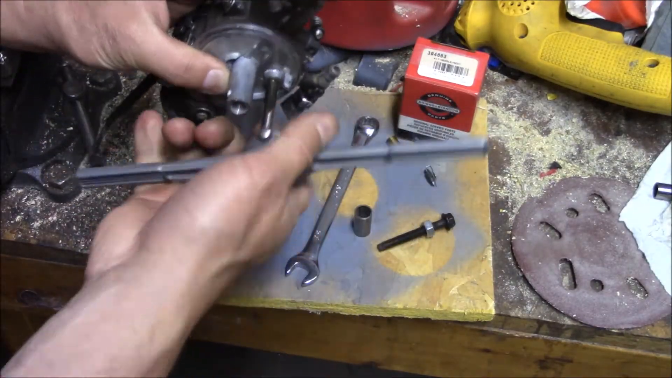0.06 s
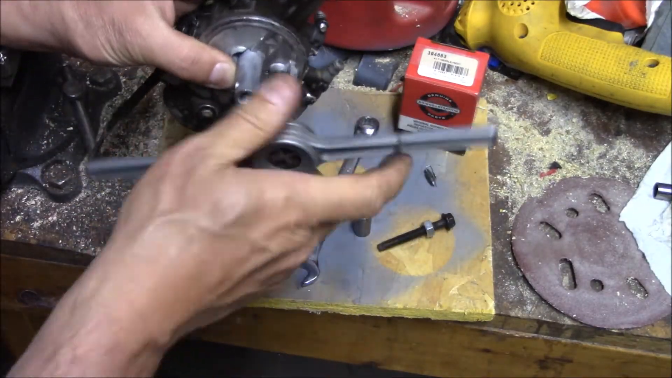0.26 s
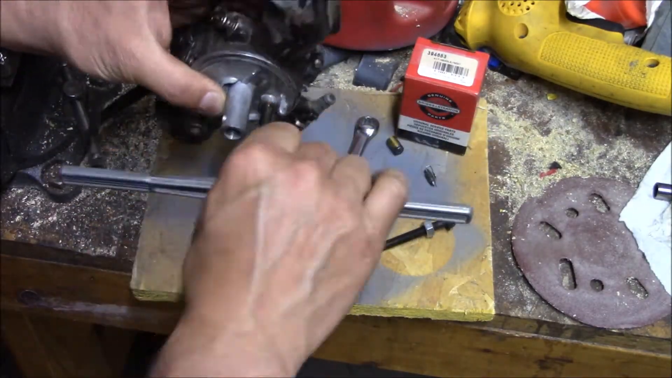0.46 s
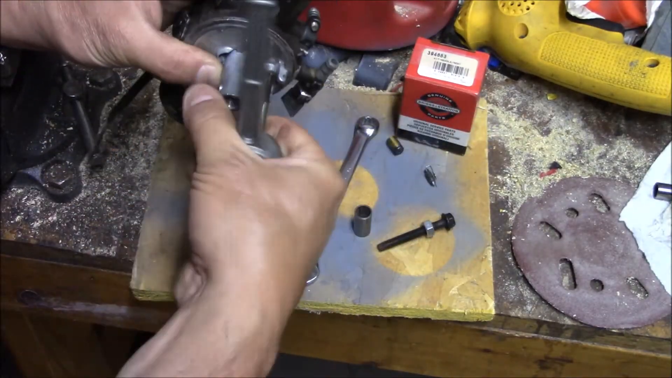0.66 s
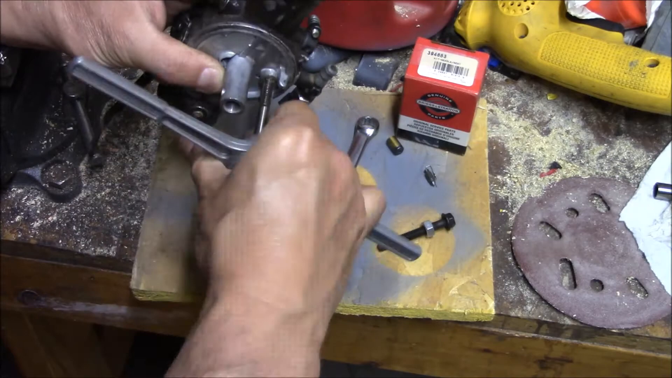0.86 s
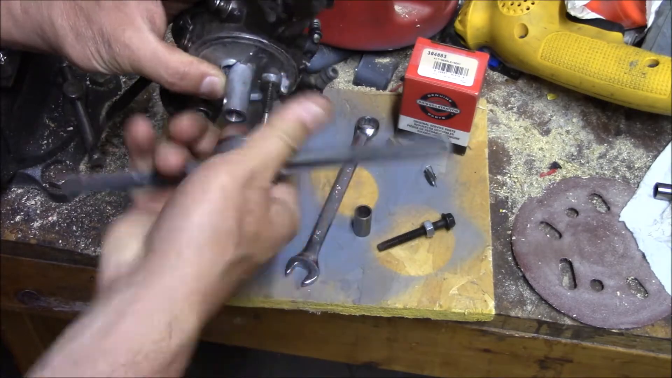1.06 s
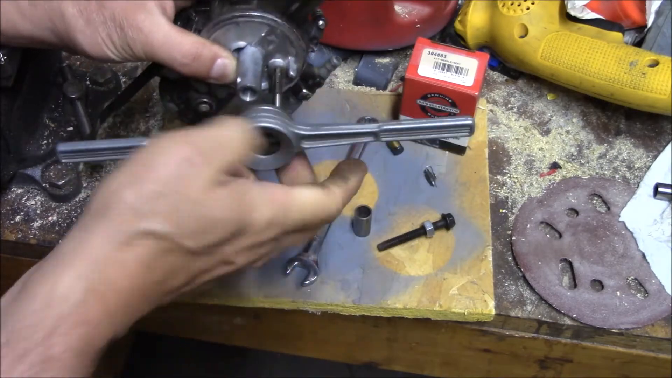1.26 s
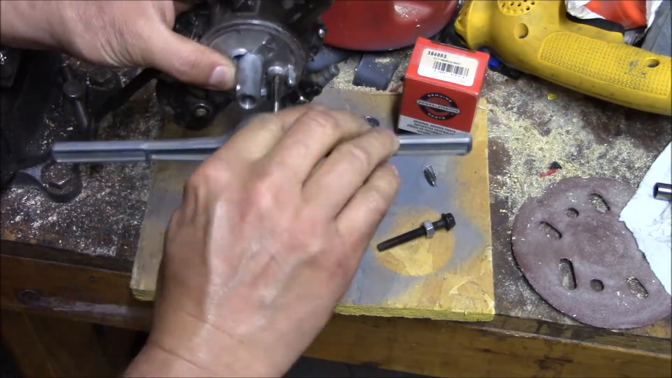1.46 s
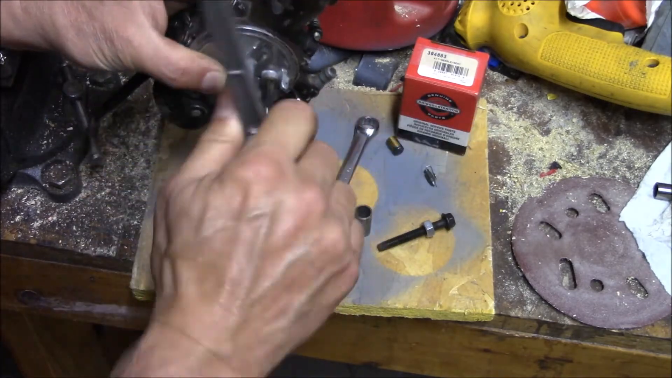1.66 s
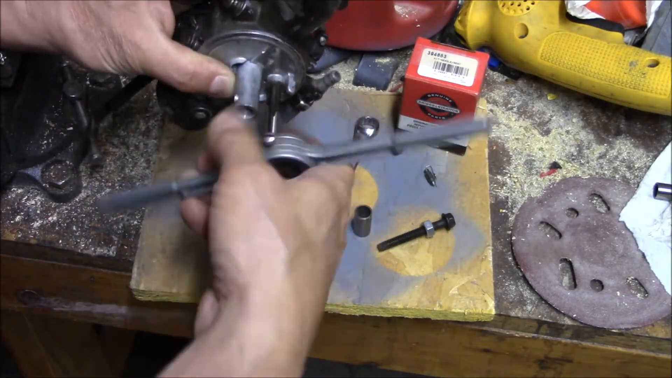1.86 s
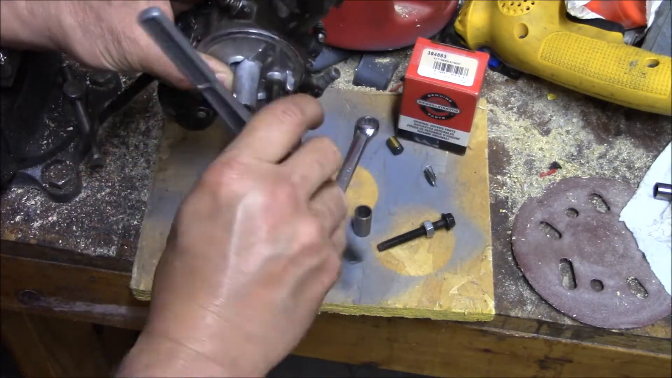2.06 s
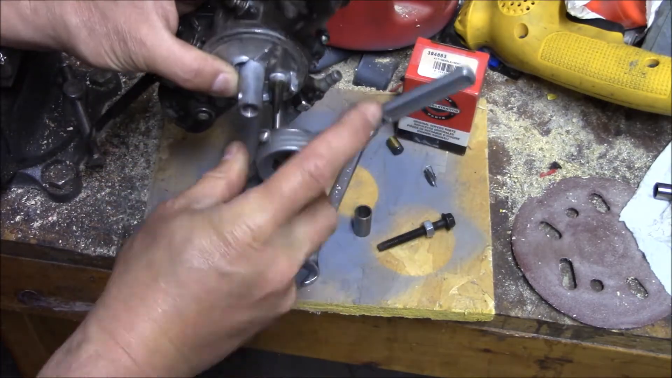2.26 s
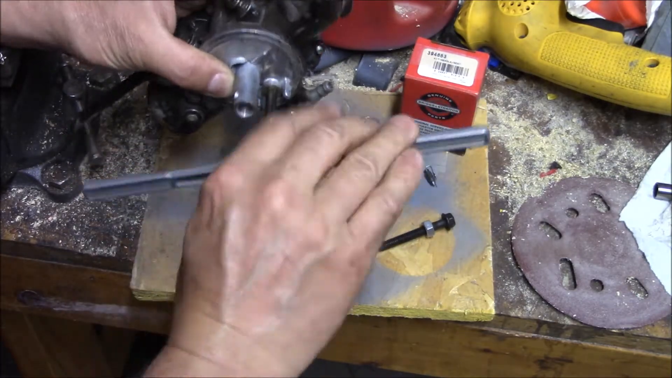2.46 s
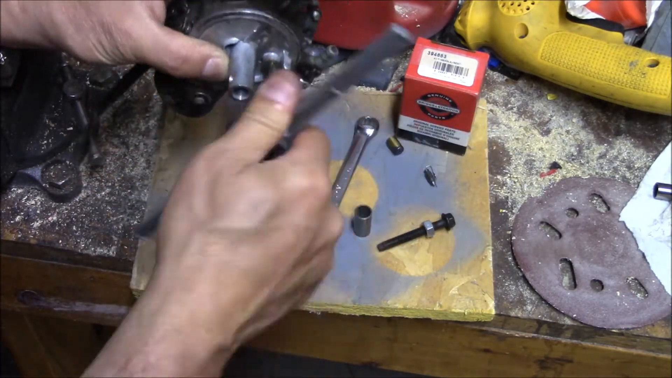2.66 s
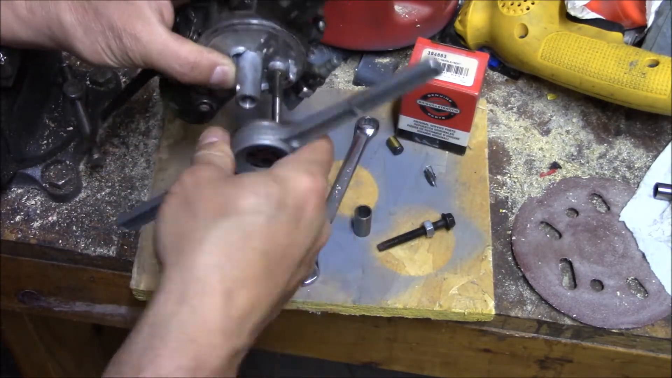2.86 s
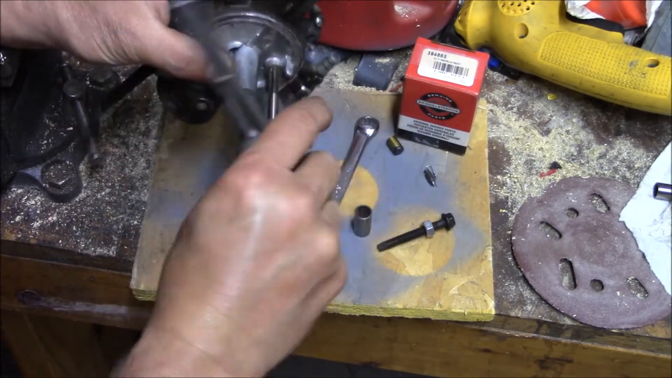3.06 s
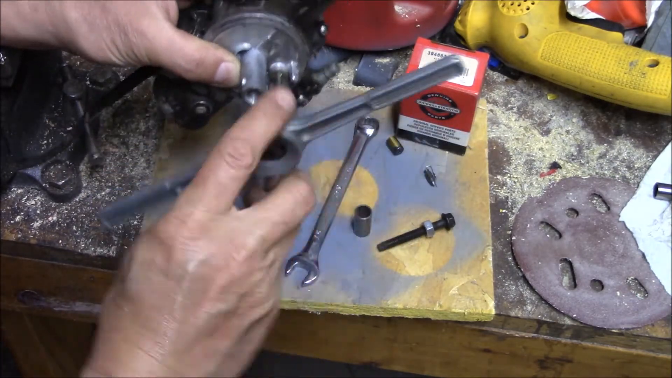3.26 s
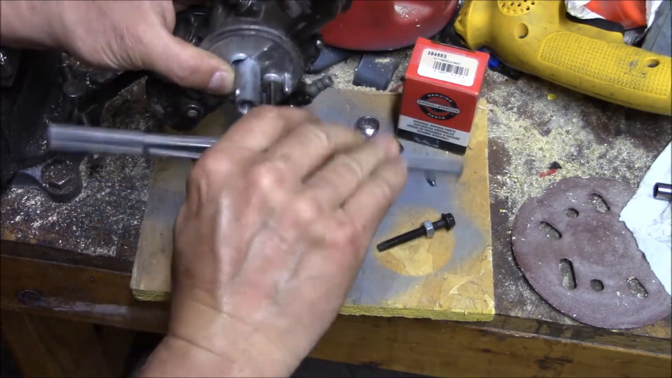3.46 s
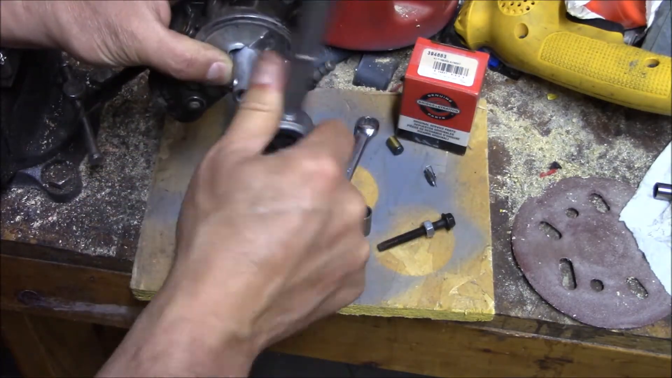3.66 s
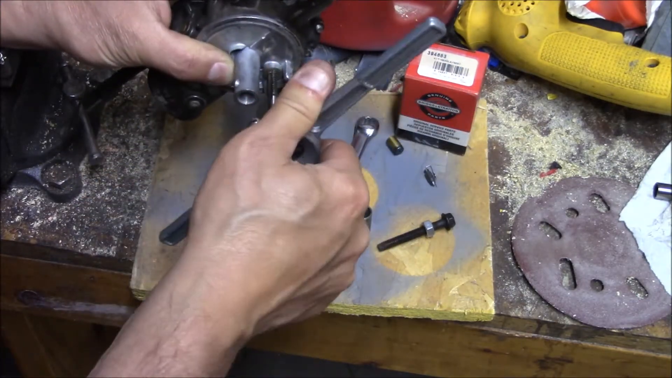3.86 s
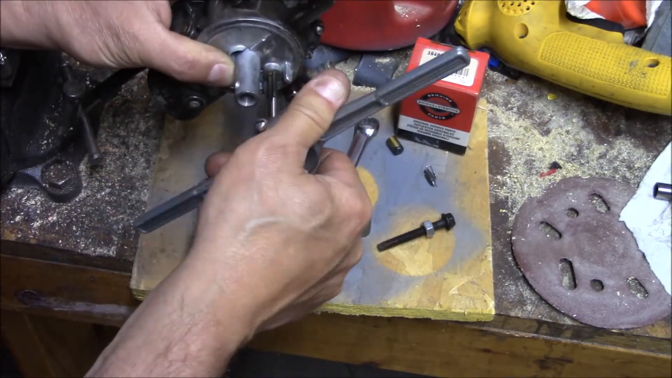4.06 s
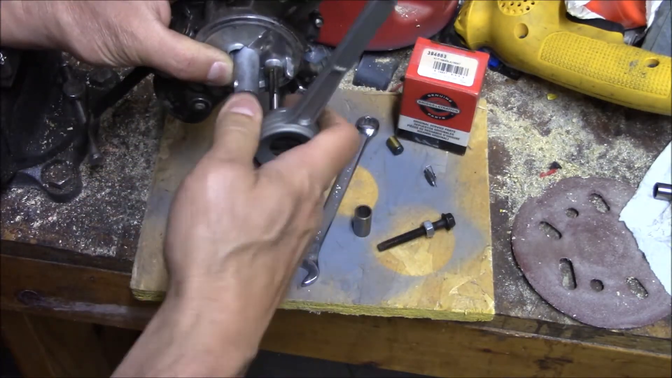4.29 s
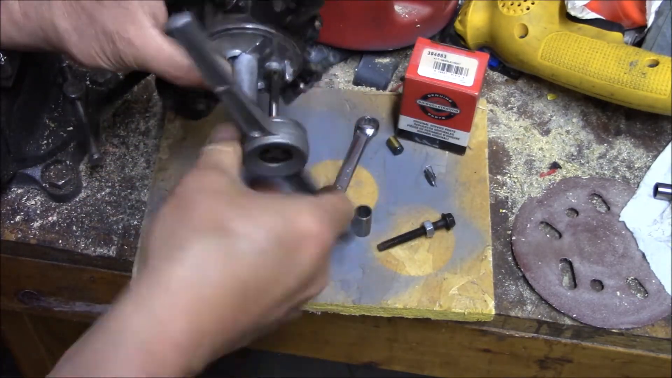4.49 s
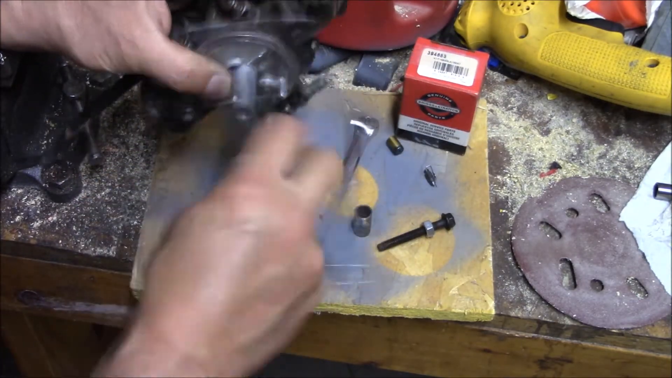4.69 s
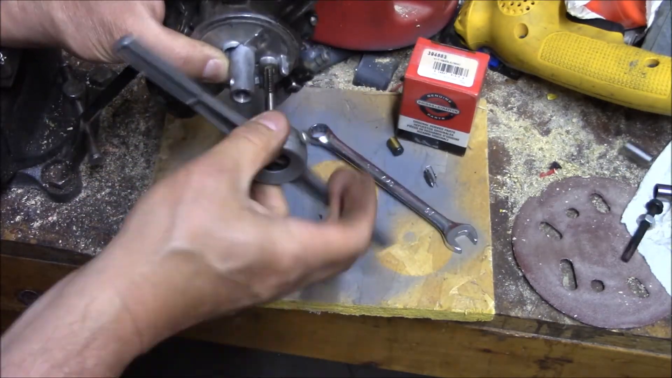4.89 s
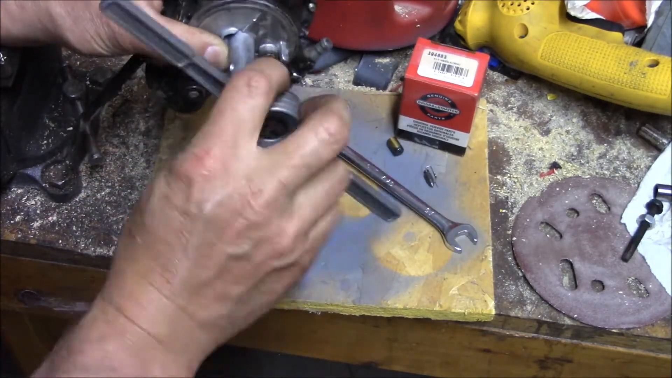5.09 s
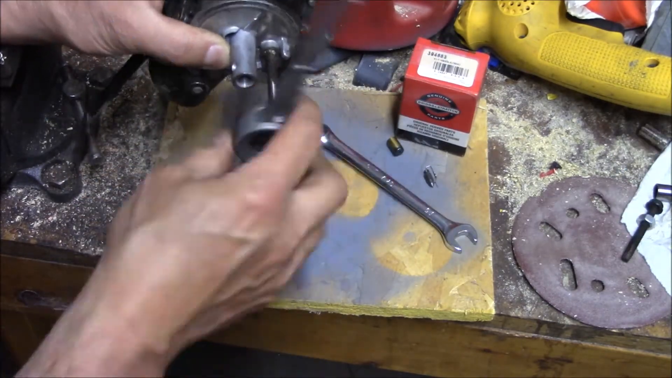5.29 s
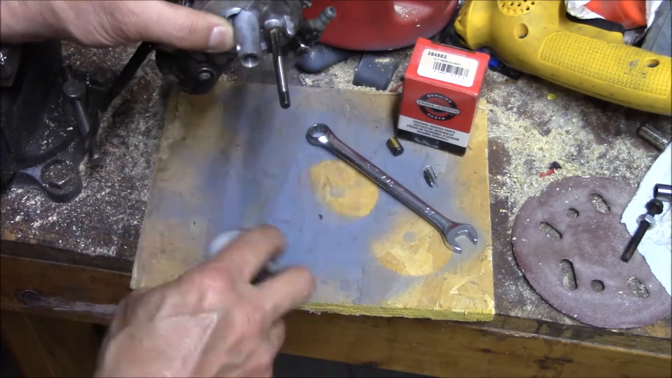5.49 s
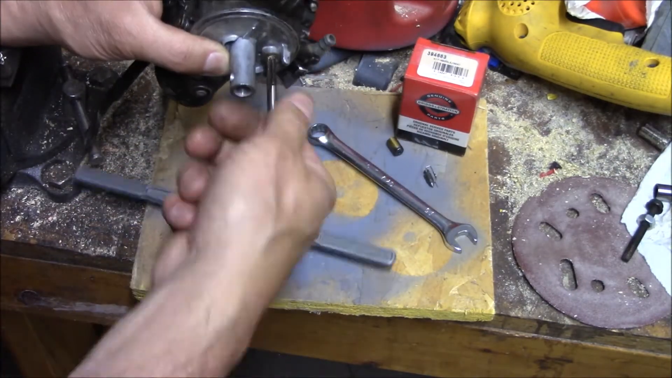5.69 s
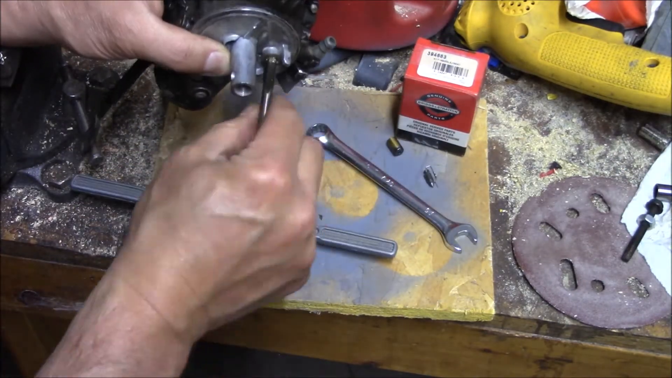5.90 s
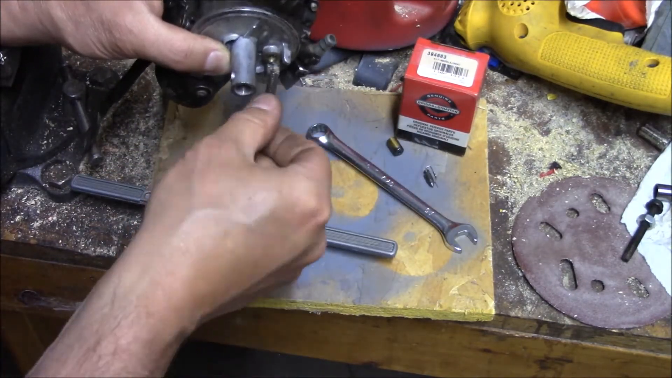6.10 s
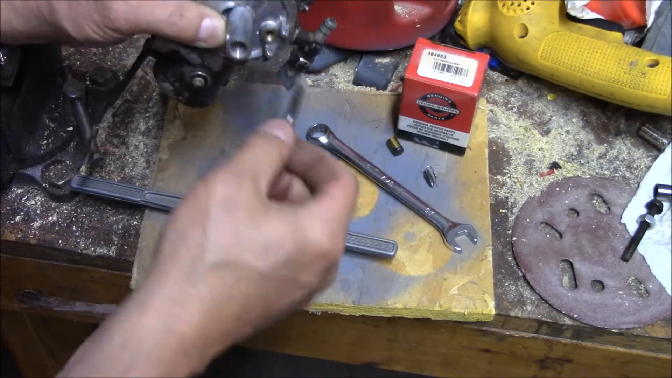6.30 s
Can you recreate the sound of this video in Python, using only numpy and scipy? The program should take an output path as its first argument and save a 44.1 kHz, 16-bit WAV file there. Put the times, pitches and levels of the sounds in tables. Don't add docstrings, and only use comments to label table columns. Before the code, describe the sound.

Close stereo workbench sound over steady airy fan noise and a very faint rapid electronic ticking. Quiet, irregular metallic clicks and light casting clinks mark each regrip of a tap wrench; between them come high dry scrapes with crackling chips and soft sleeve rubs. Then one far louder steel crack, a rattling spanner bouncing briefly, a few more ticks, a clunk as the wrench is laid down, and dull finger taps.

```python
import sys
import numpy as np
from scipy import signal
from scipy.fft import rfft, irfft, next_fast_len
from scipy.io import wavfile
from scipy.ndimage import map_coordinates

SR = 44100
rng = np.random.default_rng(int(sys.argv[2]) if len(sys.argv) > 2 else 0)


def voltage_ratio(level):
    return 10 ** (np.asarray(level, float) / 20)


def unload_wav(signal):
    wavfile.write(
        sys.argv[1],
        SR,
        np.round(np.clip(np.atleast_2d(signal).T, -1, 1) * 32767).astype(np.int16),
    )


N = 279594

# start_s, peak_db, top_modes_db
CHIP_BREAKS = [(1.4778, -42, 4), (1.4855, -42, 2), (1.494, -50, 1), (1.507, -43, -2), (1.5158, -49, 4),
               (1.5258, -44, 0), (1.5363, -46, 1), (1.5457, -51, -2), (1.5666, -46, -3), (1.5916, -35, 0),
               (1.5979, -44, -3), (1.605, -47, 1), (1.6127, -49, -1), (1.6237, -46, 1), (1.6395, -44, -1),
               (1.6499, -38, -1), (1.6568, -38, 1), (1.6721, -29, 3), (1.6828, -36, 4), (1.691, -45, 3),
               (1.7011, -43, -7), (1.7113, -43, 3), (1.7214, -39, 5), (1.73, -26, 7), (1.756, -40, 3),
               (1.7616, -46, 2), (1.7723, -36, 2), (2.475, -52, -3), (2.487, -37, 2), (2.4916, -49, -3),
               (2.4972, -44, 6), (2.5037, -46, 0), (2.5106, -39, -3), (2.5186, -45, 1), (2.5227, -37, 1),
               (2.531, -42, 0), (2.542, -39, 2), (2.5477, -38, 1), (2.5538, -43, 2), (2.56, -41, 2),
               (2.565, -40, 2), (2.5696, -41, -3), (2.5776, -39, -6), (2.5837, -37, 3), (2.5915, -41, -3),
               (2.5979, -43, -1), (2.6086, -44, -2), (2.6131, -47, 0), (2.6224, -31, 11), (2.6295, -46, -4),
               (2.6439, -35, 5), (2.6556, -44, -2), (2.6675, -41, -3), (2.6777, -47, -6), (2.6872, -42, -1),
               (2.6923, -42, -2), (2.7004, -44, -7), (2.7259, -57, -5)]
# start_s, peak_db, top_modes_db
SHORT_CUT_CATCHES = [(0.559, -44, 0), (0.5645, -36, -1), (0.5988, -40, 3), (0.6141, -38, 4),
                     (0.626, -36, 1), (0.6403, -34, 6), (0.6562, -46, 0), (0.6852, -51, -1),
                     (0.9614, -45, 2), (0.9722, -48, 1), (0.9945, -40, 6), (1.0206, -43, 1),
                     (1.0363, -47, 3), (1.0644, -46, 1), (1.0686, -48, -7), (2.1532, -43, -4),
                     (2.1763, -51, -2), (2.2108, -40, 4), (2.2221, -42, -3), (2.2497, -42, 4),
                     (2.2986, -44, 2), (2.3098, -42, 9), (2.3292, -34, -2), (2.3336, -36, 1),
                     (2.3783, -50, 7), (2.3855, -50, -1), (2.4079, -57, -6), (3.483, -32.5, 3),
                     (3.4884, -40, 0), (3.557, -37, 7), (3.5635, -39, -1), (3.5685, -40, 1),
                     (3.5811, -47, 4), (3.5855, -41, 2), (3.5946, -45, 11), (3.6069, -35, 9),
                     (3.6121, -38, 12), (3.6285, -44, 13), (3.6385, -28, 4), (3.6502, -40, 4),
                     (3.6591, -41, -7), (3.6638, -38, 7), (3.6688, -41, 1), (3.6776, -27.5, 7),
                     (3.684, -34, 3), (3.7055, -37, 3), (3.7134, -48, 3), (3.7352, -35, 7),
                     (3.7504, -35, 13), (3.7597, -49, -3), (4.4377, -41.5, -4), (4.485, -36, -6),
                     (4.5096, -39, 9), (4.5162, -46, 3), (4.544, -53, -2), (4.566, -42, 4),
                     (4.5884, -36, 5), (4.5941, -44, 5)]
# start_s, peak_db, top_modes_db
SLACK_JAWS = [(0.0133, -39, 5), (0.0558, -50, -9), (0.1201, -48, -14), (0.2212, -33, 5), (0.2291, -45, 8),
              (0.3063, -46, -2), (0.3267, -47, 4), (0.3691, -27, 6.5), (0.3793, -36, 2), (0.8886, -48, 1),
              (1.1521, -48, 6), (1.193, -40, 14), (1.1993, -35, 5), (1.2053, -33, 11), (1.2207, -42, 3),
              (1.296, -39, 1), (1.3123, -46, 0), (1.3464, -42, 5), (1.4315, -48, -4), (2.0481, -46, 5),
              (2.0523, -45, -2), (2.0615, -37.5, -3), (2.0693, -42, 1), (2.0813, -44, 1), (2.8324, -36, 4),
              (2.9721, -51, -1), (3.0284, -35, 5), (3.109, -49, -6), (3.2756, -46, -8), (3.297, -28, 10),
              (3.89, -33, 10), (3.895, -39, 1), (3.8998, -37, 2), (3.9122, -41, 10), (3.9957, -46, 3),
              (4.2433, -49, -10), (4.2689, -45, 7), (4.6844, -37, 0), (4.7667, -35, 1), (4.7755, -33.5, 9),
              (4.781, -32, 4), (4.7947, -32, 0), (4.8606, -36, 6), (4.8648, -38.5, -3), (4.9375, -40, 1),
              (4.9621, -51, -11), (5.1219, -46, 3), (5.1443, -46, -7), (5.1972, -44, 2), (5.2109, -46, 5),
              (5.2203, -48, 5), (5.339, -38, -1), (5.3425, -29, 15), (5.3611, -45, -3), (5.7538, -47, 0),
              (5.822, -42, 0), (6.012, -49, -5), (6.0578, -41, 8)]
# start_s, peak_db, top_modes_db
EXTRA_JAW_TICKS = [(1.4564, -48, -3), (1.523, -45, 0.5), (1.5325, -44, 3), (1.6462, -42, 3), (1.7338, -34, 3),
                   (1.7522, -40, 3), (3.691, -44, 2), (4.1323, -38, 6), (4.1376, -44, 3), (3.9196, -46, 4),
                   (3.5072, -49, -3)]
# start_s, clink_peak_db, upper_modes_db
RESEATS = [(0.014, -41, 9), (0.119, -37, -9), (0.221, -39, -7), (0.306, -44, -2), (0.3686, -32, 2),
           (0.551, -41, 5), (1.1928, -51, 0), (1.199, -40, 2), (1.2057, -40, 4), (1.296, -39, -5),
           (1.312, -38, -12), (1.336, -46, -8), (1.347, -40, -7), (2.048, -42, 0), (2.0523, -41, 2),
           (2.209, -46, 6), (2.2483, -44, -4), (2.3292, -42, 1), (2.3336, -41, 1), (2.832, -42, 1),
           (3.034, -40, 9), (3.029, -36, 4), (3.2968, -40, 0), (4.1323, -45, -1), (4.137, -46, 0),
           (4.509, -42, 0), (4.566, -42, 9), (4.5884, -42, 12), (4.691, -46, 0), (4.8587, -35, -3),
           (4.938, -41, 6), (5.6996, -49, -2)]
# start_s, length_s, level_db, swell_db, low_modes_relative_db
CUT_STROKES = [
    (0.548, 0.17, -64.5, -2, 6.5),
    (.96, 0.13, -69, 2, 9),
    (1.28, 0.13, -63, -2, -3),
    (1.476, 0.31, -63.5, 4, 4),
    (2.155, 0.24, -63, -9, 1.5),
    (2.497, 0.22, -59, 1.5, 1),
    (3.562, 0.23, -60, -6, 0.5),
    (4.416, 0.12, -66.5, 9, 3),
]
# start_s, level_db
JAW_RASPS = [(0.226, -67), (0.375, -58), (0.887, -63), (1.194, -53.5), (2.045, -65), (2.83, -49),
             (3.023, -55), (3.49, -62), (3.899, -54), (4.57, -61), (4.684, -55), (5.65, -66)]
# pitch_hz, width_hz, level_db
TAP_MODES = [(5490, 200, -6), (6300, 190, 0), (7650, 300, -3), (9800, 160, -8), (10600, 300, -2),
             (11600, 120, 2), (12500, 180, -6), (13000, 260, -6), (13950, 300, 2), (14700, 300, -6),
             (15500, 300, 1)]
# pitch_hz, width_hz, level_db
CASTING_MODES = [(2870, 450, 7.5), (3450, 280, 4), (3950, 500, 7.5), (4480, 440, 1), (5560, 1600, -2)]

# pitch_hz, width_hz, level_db
CRACK_MODES = [(2270, 300, -9), (4190, 260, 1.5), (4900, 300, 1), (5940, 400, -8)]
# start_s, peak_db, tilt_db_per_octave
SPANNER_BOUNCES = [(4.6955, -13, 2), (4.6985, -17, 1), (4.704, -20, 3), (4.7077, -23, 2), (4.7112, -10, 2),
                   (4.716, -8, 3), (4.7202, -18, 0.1), (4.7226, -12.5, -3), (4.731, -21, 1),
                   (4.7331, -16, 1), (4.7406, -27, 2), (4.7471, -27, 4), (4.75, -26, 5), (4.7552, -26, 7),
                   (4.7588, -39, 8), (4.772, -37, 10), (4.8003, -41, 7)]
# pitch_hz, width_hz, level_db
SPANNER_MODES = [(1384, 100, -10), (1645, 60, -10), (1911, 40, 3), (2270, 60, -3), (3586, 55, -7),
                 (4270, 70, -3), (4345, 50, -2), (4500, 500, -10), (4790, 60, -7), (4980, 45, -1),
                 (5089, 45, 0), (5330, 50, -8), (5906, 40, -4), (6900, 80, -9), (7540, 70, -9),
                 (7926, 38, 7), (10100, 40, -10), (10900, 45, -12), (11097, 60, 7), (11160, 55, 5),
                 (11790, 50, -10), (12247, 50, -4), (12380, 50, -2), (14755, 55, 1)]
# start_s, peak_db, tilt_db_per_octave
TIP_TOUCHES = [
    (5.5665, -17.5, 0.1),
    (5.5686, -23, 0.1),
]
# pitch_hz, width_hz, level_db
TIP_MODES = [(2970, 450, -1), (4750, 400, 4), (5400, 300, -1), (5900, 300, -11), (10900, 600, -14)]
# start_s, peak_db, tilt_db_per_octave
LAY_DOWN = [
    (5.5744, -22, -5),
    (5.5757, -21, -8),
    (5.5786, -23, -6),
    (5.5848, -37, -10),
    (5.59, -35, -6),
    (5.598, -33, -1),
    (5.602, -38, -8),
]
# pitch_hz, width_hz, level_db
HANDLE_MODES = [(1700, 60, -2), (1975, 45, 5), (2270, 140, 5), (2690, 130, -9), (3120, 560, -3),
                (4340, 87, -9), (4800, 530, 7), (5430, 180, 2), (5670, 230, 0), (8400, 200, -4),
                (11000, 510, 0)]
# pitch_hz, width_hz, level_db
BENCH_MODES = [(330, 90, -10), (520, 27, -1), (556, 7, 6), (584, 25, 5), (872, 12, -4), (980, 10, -3),
               (1100, 50, -6)]
# start_s, peak_db, casting_clink_db, pitch_hz
DULL_BUMPS = [(0.1196, -33, -12, 900), (0.1239, -38.5, -9, 1090), (0.1336, -44, -15, 900),
              (0.146, -49, -15, 850), (0.3684, -45, -2, 900), (4.858, -38, -2, 1400),
              (4.8735, -40, 4, 1300), (5.567, -36, -6, 1400), (5.579, -32, -12, 750),
              (5.592, -38, -10, 1300), (5.618, -46, -16, 1010), (5.657, -45, -10, 840),
              (5.811, -45, -21, 1220), (5.896, -40, -19, 970), (5.904, -44, -20, 1110),
              (5.914, -39.5, -26, 870), (5.93, -52, -13, 860), (6.136, -37.5, -15, 990),
              (6.158, -35.5, -17, 840), (6.167, -39.5, -18, 900), (6.185, -36, -18, 1500),
              (6.199, -40.5, -24, 799), (6.303, -34.5, -16, 1010), (6.31, -36, -15, 900),
              (6.317, -35, -16, 797), (6.33, -36, -11, 875), (6.336, -38.5, -10, 950)]
# ratio_to_pitch, width_ratio, level_db
BOARD_MODES = [(.58, 0.2, -6), (.82, 0.15, 1), (1, 0.2, 4), (1.3, 0.23, 1), (1.7, 0.28, -3.5),
               (2.3, 0.36, -5.5), (3.2, .7, -16)]

# centre_s, half_length_s, level_db
SLEEVE_SWEEPS = [(0.021, 0.16, -63.5), (0.253, 0.16, -63), (0.572, 0.14, -61.5), (0.801, 0.3, -66.5),
                 (1.358, 0.092, -61), (1.637, .05, -63.5), (1.96, 0.1, -59.5), (2.25, 0.091, -62),
                 (2.639, 0.12, -59.5), (2.823, 0.045, -62), (2.999, 0.077, -62.5), (3.201, 0.085, -60.5),
                 (3.847, 0.11, -67.5), (4.129, 0.062, -64), (4.481, 0.083, -60.5), (4.818, 0.14, -63.5),
                 (5.151, 0.16, -69.5), (5.702, 0.081, -61.5)]
# centre_s, level_db
CUFF_FLICKS = [
    (1.785, -65),
    (2.25, -56),
    (2.829, -59.5),
    (3.45, -63),
    (5.329, -65),
    (5.951, -66),
]
# centre_s, half_length_s, level_db, pitch_hz
TOOL_DRAGS = [
    (5.635, 0.03, -58, 2100),
    (5.685, 0.04, -59, 2150),
    (0.165, 0.04, -60, 1300),
    (4.88, 0.025, -55, 1500),
]

# pitch_hz, width_hz, level_db
BUZZ_MODES = [(5330, 900, -3), (7000, 3700, -3.5), (10100, 2530, -8)]
# pitch_hz, level_db_per_hz
FAN_AIR = [(12, -62), (20, -20.5), (202, -20), (354, -13.5), (418, -9), (672, -4.5), (1210, -2.5),
           (1690, -3), (1830, -5), (3480, -8), (4250, -9), (4650, -13), (6500, -13.5), (8740, -14.5),
           (15700, -19)]
# pitch_hz, width_hz, gain_db
DUCT_MODES = [(5410, 170, -0.5), (8440, 300, -9), (11400, 340, -7)]
# pitch_hz, left_right_likeness
PORT_LIKENESS = [(60, -0.26), (180, 0.21), (550, 0.66), (1650, 0.57), (4970, 0.43), (15000, 0.74)]
# pitch_hz, level_db
MOTOR_LINES = [(236.9, -93), (958.2, -75.5), (1179, -77), (1416, -76), (1647, -74.5)]
# centre_s, half_length_s, pitch_hz, level_db
FAR_MOTOR = (1.1, 0.25, 680, -72)
# pitch_hz, t60_s
SHOP_DECAY = [(300, 0.28), (2000, 0.11), (6000, 0.083), (15000, 0.039)]
# pitch_hz, left_minus_right_db
WORK_LEAN = [(60, -5), (180, -3), (550, 0), (1650, 1), (4970, 0.5), (15000, 0.5)]

LEAD_SAMPLES = 96


def unit(x):
    return x / np.sqrt(np.mean(x ** 2) + 1e-20)


def along(points, hz):
    f, v = np.transpose(points)
    return np.interp(np.log(hz + 1), np.log(f + 1), v)


def curves(rows):
    s, *cols = np.transpose(rows)
    return [np.interp(np.arange(N) / SR, s, c) for c in cols]


def wobble(rate):
    return map_coordinates(rng.standard_normal(int(N * rate / SR) + 4), [np.arange(N) * rate / SR])


def filtered(x, response):
    m = next_fast_len(N + SR // 2)
    return irfft(rfft(x, m) * response(np.fft.rfftfreq(m, 1 / SR)), m)[..., :N]


def add(track, s, sound):
    track[round(s * SR) - LEAD_SAMPLES:][:len(sound)] += sound


def body(peaks, f, scatter_db=0, broad=0, detune=0):
    centre, width, db = np.transpose(peaks)[:, :, None]
    luck = rng.standard_normal((2, len(peaks), 1))
    centre = centre * (1 + detune * luck[1])
    sign = (-1.) ** np.arange(len(peaks))[:, None]
    strength = sign * voltage_ratio(db + scatter_db * luck[0])
    modes = (strength * 1j * f * width / (centre * centre - f * f + 1j * f * width)).sum(0)
    return modes + broad * (1j * f / (centre.min() + 1j * f)) ** 2


def strike(peaks, scatter_db, broad, chatter_s, snap=3, detune=0, colour=lambda f: 1, size=8192):
    t, f = np.arange(size) / SR, np.fft.rfftfreq(size, 1 / SR)
    force = voltage_ratio(-60 * t / chatter_s) * rng.standard_normal(len(t))
    force[0] = snap
    ring = rfft(force) * body(peaks, f, scatter_db, broad, detune) * colour(f)
    blow = np.roll(irfft(ring), LEAD_SAMPLES)
    blow = blow * signal.windows.tukey(len(t), LEAD_SAMPLES / len(t))
    return blow / np.abs(blow).max()


def grit(rate, clump_db):
    return rng.standard_normal(N) * (rng.random(N) < rate / SR) * voltage_ratio(clump_db * wobble(150))


def ticks():
    out = np.zeros(N + SR)
    top_grows, top_rest_db, trim_db = 1.3, -3.5, 0.3
    for s, db, top_db in CHIP_BREAKS + SHORT_CUT_CATCHES + SLACK_JAWS + EXTRA_JAW_TICKS:
        top = lambda f: voltage_ratio(np.interp(f, [11800, 13400], [0, top_grows * top_db + top_rest_db]))
        slap = strike(TAP_MODES[2:], 2.5, broad=0.3, chatter_s=0.007, snap=5, detune=0.008,
                      colour=top, size=1024)
        add(out, s, voltage_ratio(db + trim_db) * slap)
    for s, db, upper_db in RESEATS:
        upper = lambda f: voltage_ratio(np.interp(f, [3200, 3800], [0, upper_db]))
        clink = strike(CASTING_MODES, 1.5, broad=0.3, chatter_s=0.022, snap=5, detune=0.025,
                       colour=upper, size=2048)
        add(out, s, voltage_ratio(db) * clink)
    return out[:N]


def scrape():
    bite_s, ease_s = 0.013, 0.025
    rasp_s, rasp_fade_db, rasp_low_db = 0.05, -6, -3
    moves = CUT_STROKES + [(s, rasp_s, db, rasp_fade_db, rasp_low_db) for s, db in JAW_RASPS]
    rows = []
    for start, length, db, swell_db, low_db in sorted(moves):
        end = start + length
        rows += [(start - bite_s, -85, low_db), (start, db - 2, low_db)]
        rows += [(end - ease_s, db - 2 + swell_db, low_db), (end, -85, low_db)]
    level_db, low_db = curves(sorted(rows))

    slips = unit(grit(700, clump_db=3))
    rub = unit(grit(5000, clump_db=4))

    def low_ring(modes):
        rung = filtered(0.6 * slips + rub, lambda f: body(modes, f, broad=0.14))
        return voltage_ratio(3.5 * wobble(45)) * unit(rung)

    low = low_ring(TAP_MODES[:2]) + 0.35 * low_ring(TAP_MODES[2:3])
    edge = lambda f: 0.42 * (1j * f / (6500 + 1j * f)) ** 3
    high = unit(filtered(slips + 0.4 * rub, lambda f: body(TAP_MODES[3:], f) + edge(f)))
    return voltage_ratio(level_db + 2.4 * wobble(55)) * (high + voltage_ratio(low_db - 2.5) * low)


def swing():
    crack, jolt = np.zeros((2, N + SR))
    hit_s = 4.6956
    add(crack, hit_s, voltage_ratio(-0.5) * strike(CRACK_MODES, 0, broad=0.15, chatter_s=0.013, snap=6))
    jolt_modes = [(40, 80, -9), (200, 70, -4), (370, 150, 0)]  # pitch_hz, width_hz, level_db
    add(jolt, hit_s, voltage_ratio(-45) * strike(jolt_modes, 0, broad=0, chatter_s=0.0064))
    return crack[:N], jolt[:N]


def slide():
    skid_s, level_db = 4.693, -29.5
    grab_s, hold_s, fade_db_per_s = 0.0041, 0.034, 480
    t = np.arange(N) / SR - skid_s
    grab = np.clip(t / grab_s, 0, 1) ** 2
    level = grab * voltage_ratio(level_db - fade_db_per_s * np.clip(t - grab_s - hold_s, 0, 1))
    rattle = filtered(grit(9000, clump_db=4), lambda f: body(SPANNER_MODES, f, broad=0.3))
    return level * unit(rattle)


def dropped(contacts, steel, broad, chatter_s, board_db):
    out = np.zeros(N + SR)
    thud_grows = 0.45
    loudest_db = max(row[1] for row in contacts)
    for s, db, tilt_db in contacts:
        colour = lambda f: voltage_ratio(tilt_db * np.log2(np.clip(f, 2000, None) / 5000))
        add(out, s, voltage_ratio(db) * strike(steel, 2.0, broad, chatter_s, snap=6.5, colour=colour))
        thud_db = board_db + thud_grows * (db - loudest_db)
        add(out, s, voltage_ratio(thud_db) * strike(BENCH_MODES, 2.5, broad=0, chatter_s=0.021))
    return out[:N]


def bumps():
    out = np.zeros(N + SR)
    dull = lambda f: 1 / (1 + 1j * f / 3800) ** 2
    for s, db, clink_db, hz in DULL_BUMPS:
        board = np.array(BOARD_MODES) * [hz, hz, 1]
        thud = strike(board, 2.9, broad=0.18, chatter_s=0.05, snap=2.5, detune=0.036, colour=dull)
        clink = strike(CASTING_MODES, 2.5, broad=0.9, chatter_s=0.06, snap=1.5, detune=0.05, colour=dull)
        add(out, s, voltage_ratio(db) * thud)
        add(out, s, voltage_ratio(db + clink_db) * clink)
    return out[:N]


def brushing(moves):
    out = np.zeros(N + SR)
    t, f = np.arange(SR // 2) / SR - 0.25, np.fft.rfftfreq(SR // 2, 1 / SR)
    for s, half_s, db, hz in moves:
        hump = np.abs(body([(hz, 0.31 * hz, 0)], f)) ** 1.03
        friction = unit(irfft(rfft(rng.standard_normal(len(t))) * hump))
        out[round(s * SR):][:len(t)] += voltage_ratio(db) * np.exp(-(t / half_s) ** 2) * friction
    return out[SR // 4:][:N] * voltage_ratio(0.93 * wobble(25.02))


def sleeve():
    sweeps = [(*row, 1010) for row in SLEEVE_SWEEPS]
    flicks = [(s, 0.059, db, 1560) for s, db in CUFF_FLICKS]
    return brushing(sweeps + flicks)


def glance(x):
    t = np.arange(SR // 100) / SR
    scatter = rng.standard_normal(len(t)) * voltage_ratio(-60 * t / 0.0097)
    side = signal.fftconvolve(x, scatter / np.linalg.norm(scatter))[:N]
    treble = lambda hz: (1j * hz / (2500 + 1j * hz)) ** 2 / (1 + 1j * hz / 14000)
    return filtered(side, treble) * [[1], [-1]]


def shop(x):
    out, step = np.zeros((2, N + SR)), SR // 4
    for start in range(0, N, step):
        hz, t, z = signal.stft(rng.standard_normal((2, SR // 3)), SR, nperseg=256)
        decay = voltage_ratio(-60 * t / along(SHOP_DECAY, hz)[:, None])
        tail = signal.istft(z * decay, SR, nperseg=256)[1]
        tail[1] = 0.93 * tail[0] + 0.5 * tail[1]
        wet = signal.fftconvolve(x[None, start:start + step], tail / np.linalg.norm(tail[0]), axes=1)
        out[:, start + 60:start + 60 + wet.shape[1]] += wet
    return out[:, :N]


def buzz():
    first_s, field_hz, peak_db = 0.0052, 60 / 1.001, -55.5
    t = (np.arange(N) / SR - first_s) % (1 / field_hz)
    burst = voltage_ratio(-60 * t / 0.011) * (1 - np.exp(-t / 0.0003)) * rng.standard_normal(N)
    tick = filtered(burst, lambda f: body(BUZZ_MODES, f))
    return voltage_ratio(peak_db - 16.0) * unit(tick)


def fan():
    def air_colour(hz):
        turn = np.arccos(np.clip(along(PORT_LIKENESS, hz), -1, 1)) / 2
        whistle = 1 + np.abs(body(DUCT_MODES, hz))
        return voltage_ratio(along(FAN_AIR, hz)) * whistle * [np.cos(turn), np.sin(turn)]

    air = rng.standard_normal((2, N)) * voltage_ratio(0.67 * wobble(7.7))
    mid, side = filtered(air, air_colour)
    t = np.arange(N) / SR
    hum = np.zeros(N)
    for hz, db in MOTOR_LINES:
        level = np.sqrt(2) * voltage_ratio(db + 2.55 * wobble(6.3))
        hum += level * np.sin(2 * np.pi * hz * t + 0.97 * wobble(8.7))
    s, half_s, hz, db = FAR_MOTOR
    hum += voltage_ratio(db) * np.exp(-((t - s) / half_s) ** 2) * np.sin(2 * np.pi * hz * t)
    air_db = -56 - 2.5
    return voltage_ratio(air_db) * unit(np.array([mid + side, mid - side])) + hum


def scene():
    crack, jolt = swing()
    work = ticks() + scrape() + bumps() + slide() + crack
    work = work + dropped(SPANNER_BOUNCES, SPANNER_MODES, 0.3, 0.02, board_db=-40)
    work = work + dropped(LAY_DOWN, HANDLE_MODES, 0.75, 0.025, board_db=-48)
    work = work + dropped(TIP_TOUCHES, TIP_MODES, 0.09, 0.012, board_db=-46)
    work = filtered(work, lambda hz: (1j * hz / (330 + 1j * hz)) ** 3)

    half = np.array([[0.5], [-0.5]])
    near = filtered(work + jolt + sleeve(), lambda hz: voltage_ratio(half * along(WORK_LEAN, hz)))
    room = voltage_ratio(-11) * shop(work) + voltage_ratio(-12) * glance(work)
    background = fan() * voltage_ratio(half * 0.36) + buzz() * voltage_ratio(half * 5)
    return near + room + background + brushing(TOOL_DRAGS)


def low_pass(x):
    return signal.sosfilt(signal.butter(12, 17090, fs=SR, output="sos"), x)


def record(dry):
    top_hz = 15800
    limit = lambda hz: voltage_ratio(np.interp(hz, [top_hz - 150, top_hz + 150, 16600, 16900], [0, -26, -32, -90]))
    return low_pass(filtered(dry, limit))


dry = scene()
out = record(dry)
unload_wav(out)
```